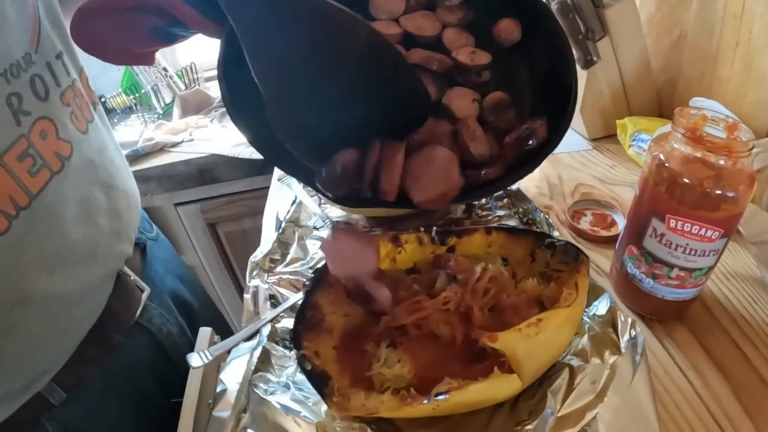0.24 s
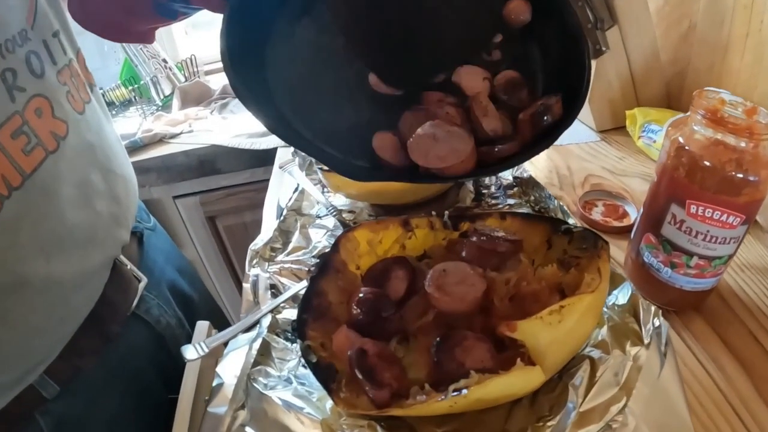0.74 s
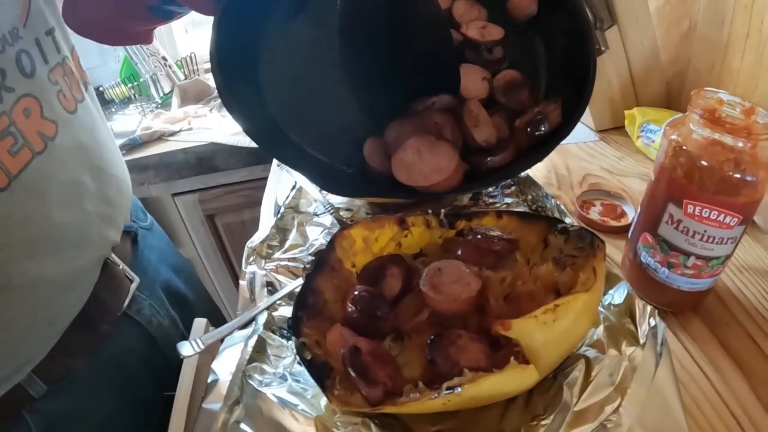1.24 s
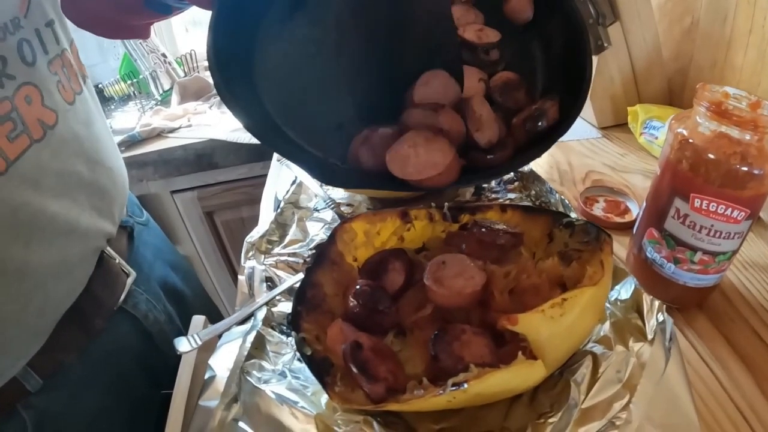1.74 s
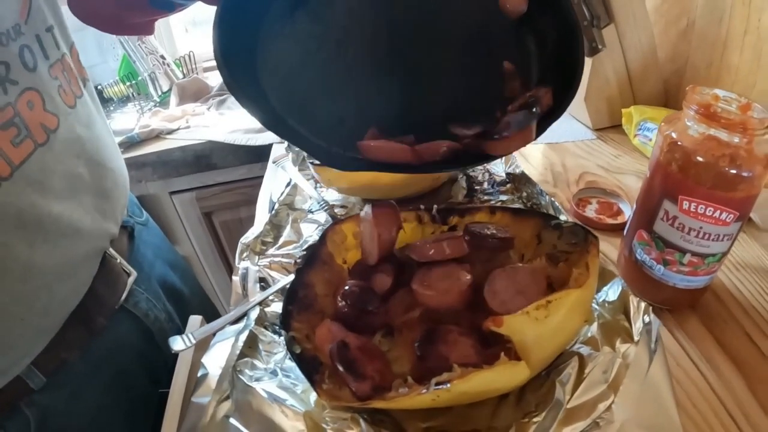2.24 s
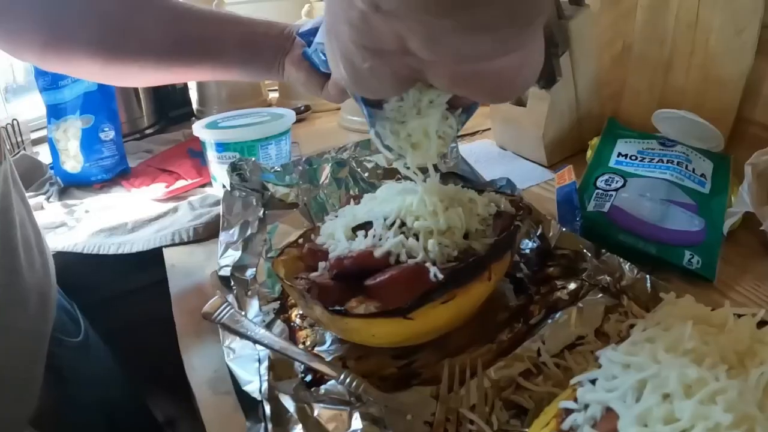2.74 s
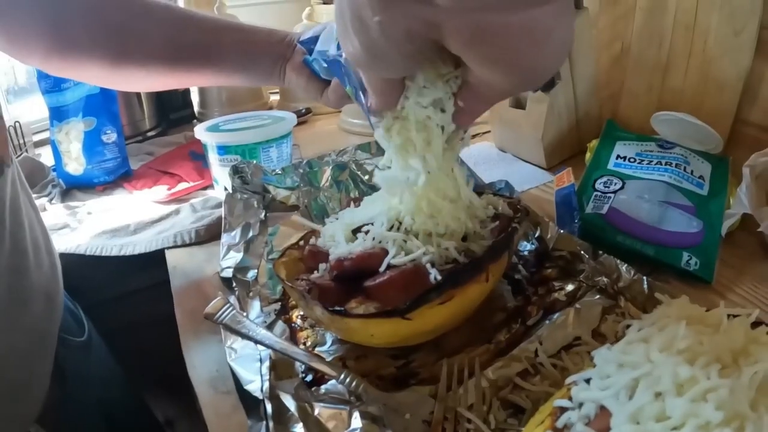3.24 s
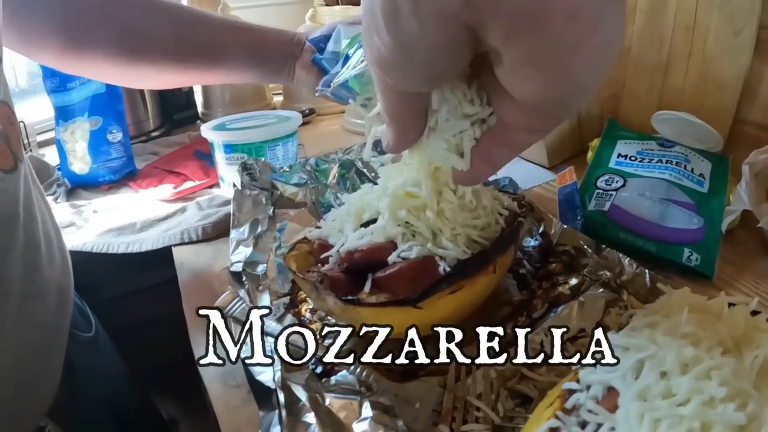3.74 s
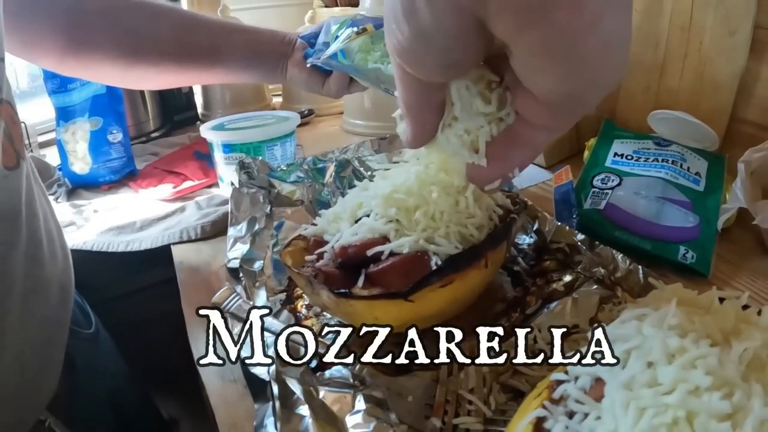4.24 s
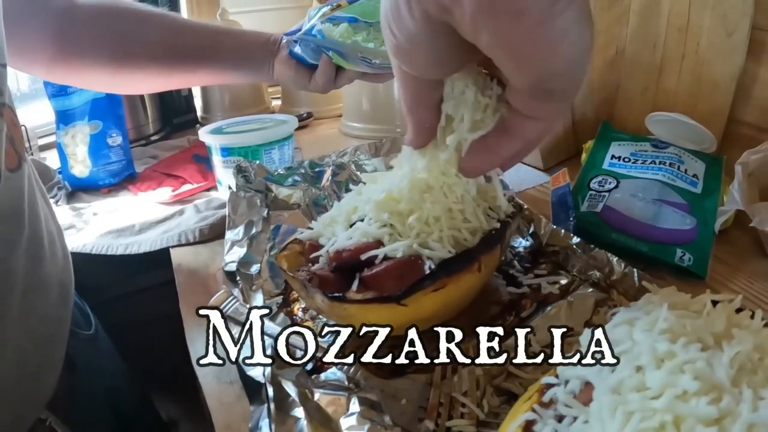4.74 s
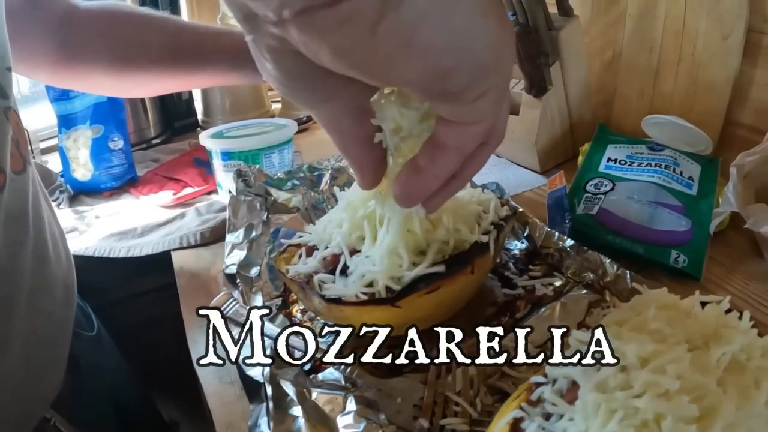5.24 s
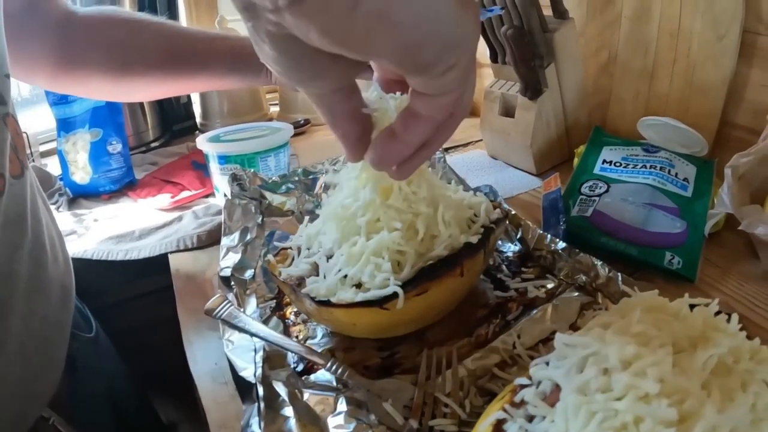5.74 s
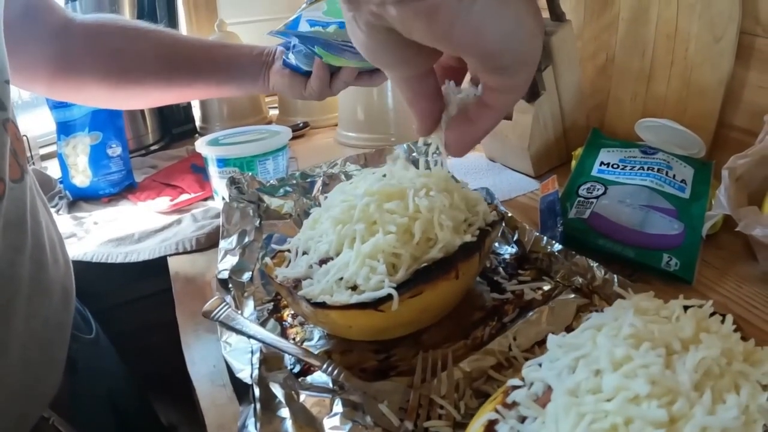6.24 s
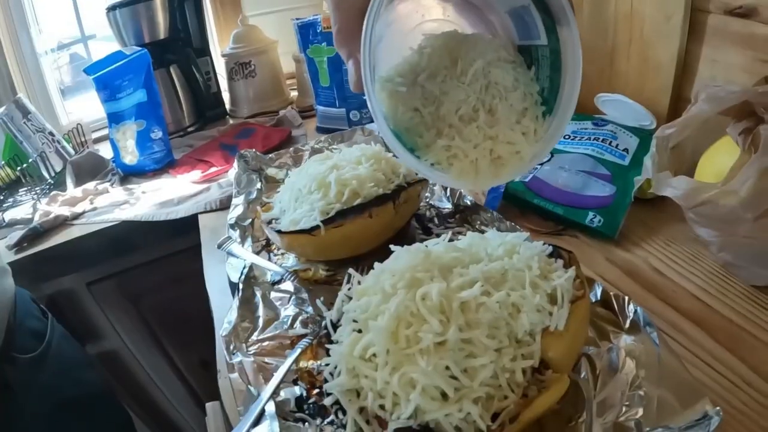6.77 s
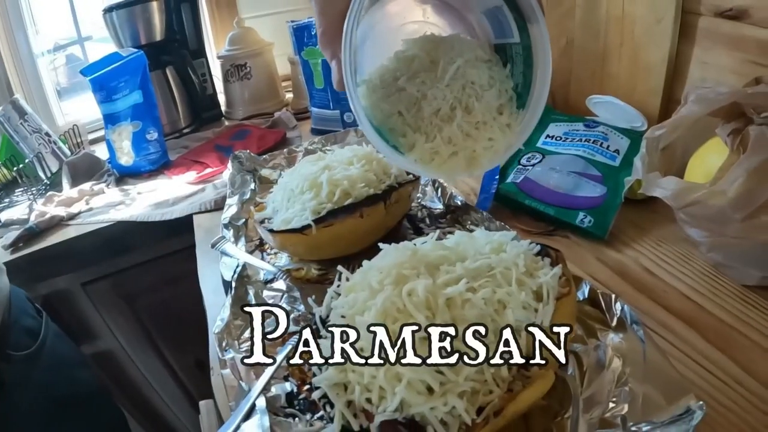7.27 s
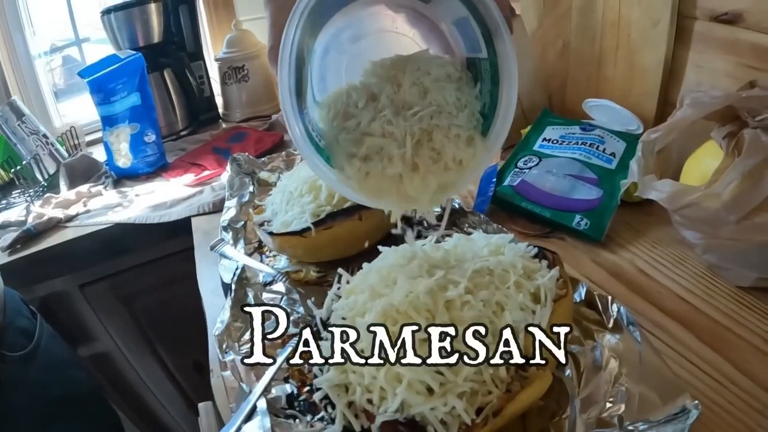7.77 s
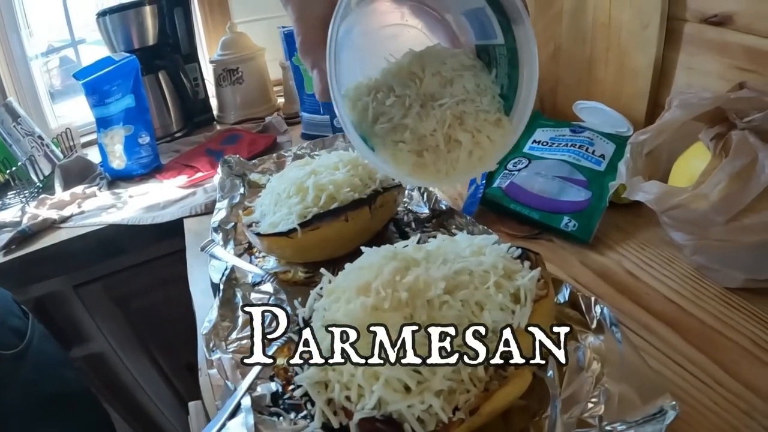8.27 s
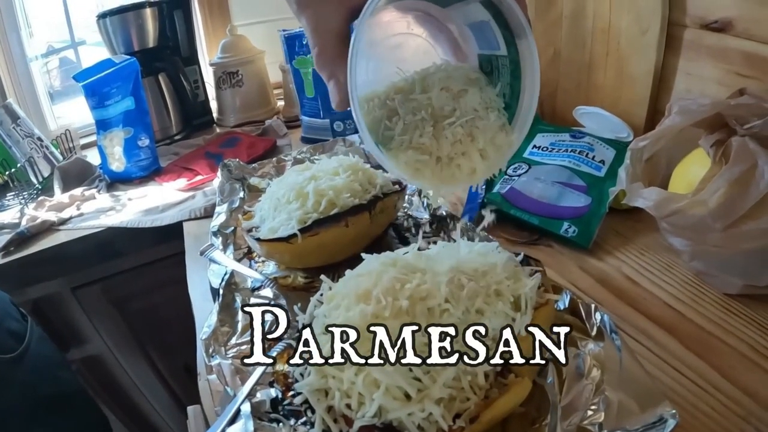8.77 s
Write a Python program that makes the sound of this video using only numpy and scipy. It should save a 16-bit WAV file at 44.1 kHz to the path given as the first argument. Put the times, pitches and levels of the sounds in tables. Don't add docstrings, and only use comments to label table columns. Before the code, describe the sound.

A close kitchen-counter scene over faint steady hum and restless low rumble, with a short room tail. From 0 to 2.7 seconds a spoon scrapes slices from an iron pan: fine gritty rustle, small ticks, a bright tick near 0.65, a damped clunk at 1.36, a sharper knock at 1.5, faint greasy squeaks around 2, and a brief ringing skid at 2.65. At 2.75 it cuts to a plastic bag, with a low nudge, then dense crinkling and snapping, strongest from 3.4 to 5 and again around 6, while shreds patter on foil. From 6.45 things quieten: a tub's contents slide softly, a heavy low thump hits at 7.7 with a smaller thud at 7.9, then a loud crisp tap at 8.35 and lighter taps until about 8.9. The small camera on the counter gives a close, slightly boxy, narrow stereo sound.

```python
import sys
import numpy as np
from scipy import signal
from scipy.fft import rfft, irfft
from scipy.io import wavfile
from scipy.ndimage import uniform_filter1d

SR = 44100
rng = np.random.default_rng(int(sys.argv[2]) if len(sys.argv) > 2 else 0)


def magnitude_from_level(level_db):
    exponent = np.asarray(level_db, float) / 20
    return 10 ** exponent


def put_to_file(sound):
    columns = np.atleast_2d(sound).T
    safe = np.clip(columns, -1, 1)
    whole_steps = np.round(safe * 32767)
    wavfile.write(sys.argv[1], SR, whole_steps.astype(np.int16))


N = 397341


def evened(x):
    return x / np.sqrt(np.mean(x ** 2) + 1e-20)


def smoothed(x, first, second):
    return uniform_filter1d(uniform_filter1d(x, size=first), size=second)


def read(points, hz):
    f, value = np.transpose(points)
    return np.interp(np.log(hz + 1), np.log(f + 1), value)


def add(mix, s, sound):
    part = mix[..., round(s * SR):][..., :sound.shape[-1]]
    part += sound[..., :part.shape[-1]]


def causal(db):
    log = np.log(magnitude_from_level(np.maximum(db, -100)))
    full = np.concatenate([log, log[-2:0:-1]])
    return np.exp(np.conj(signal.hilbert(full)))[:len(db)]


# frequency in Hz, left-right likeness from 0 to 1.
PORT_LIKENESS = [(300, .988), (700, .975), (1400, .93), (2800, .83), (5500, .91), (13000, .72)]


def pair(a, b):
    hz = np.fft.rfftfreq(len(a), 1 / SR)
    same = np.clip(read(PORT_LIKENESS, hz), 0, 1)
    shade = magnitude_from_level(-2.5 * (hz / 13000) ** 2)
    right = shade * (same * rfft(a) + np.sqrt(1 - same ** 2) * rfft(b))
    return np.array([a, irfft(right, len(a))])


def ring(modes, tilt_db, t):
    total = 0
    for hz, db, t60 in modes:
        octaves = np.log2(hz / modes[0][0])
        total = total + magnitude_from_level(db + tilt_db * octaves - 60 * t / t60) * np.sin(2 * np.pi * hz * t)
    return total


# frequency in Hz, level in dB per Hz.
HUM = [(65, -33.5), (110, -8.5), (247, -8), (336, -6.5), (414, -18), (509, -20), (613, -23.5), (739, -30.5),
       (890, -26), (10500, -58.5), (15500, -85)]
# time in seconds, level in dB.
RUMBLE = [(0.0, -43.5), (1.5, -45), (2.46, -48.5), (4.54, -51), (6.5, -52.5), (6.731, -46), (7.501, -50.5),
          (7.68, -42.5), (8.08, -46), (9.01, -47)]


def room():
    hz = np.fft.rfftfreq(N, 1 / SR)
    a, b, c = rfft(rng.standard_normal((3, N)))
    hum = pair(*irfft(np.array([a, b]) * magnitude_from_level(read(HUM, hz)), N))
    hum = hum + 0.38 * np.array([1, -1])[:, None] * np.roll(hum[0], SR)
    lumps = [(4, -3.0), (18, 14.5), (45, 1.5), (62, -7), (90, -19.5), (150, -53.5)]  # Hz, dB
    low = evened(irfft(c * magnitude_from_level(read(lumps, hz)), N))
    s, db = np.transpose(RUMBLE)
    rumble = magnitude_from_level(np.interp(np.arange(N) / SR, s, db)) * np.array([low, low + 0.66 * np.roll(low, SR)])
    return magnitude_from_level(-64.5 + 3.5) * evened(hum) + rumble


def nudge():
    t = np.arange(SR // 5) / SR
    return magnitude_from_level(-26.5) * np.sin(2 * np.pi * 10.6 * t) * np.exp(-t / 0.091)


# frequency in Hz, level in dB, t60 in seconds.
COUNTER = [(42, 6, 0.2), (60, -4, 0.5), (98, -8, 0.33), (136.5, -10, 0.3), (206.7, -3, 0.068)]


def bump(db, tilt_db):
    t = np.arange(SR) / SR
    rocking = magnitude_from_level(3.0 * evened(smoothed(rng.standard_normal(SR), 500, 500)))
    x = -ring(COUNTER, tilt_db, t) * (1 - np.exp(-t / 0.009)) ** 2 * rocking
    late = np.pad(x, (300, 0))[:SR]
    return magnitude_from_level(db) * np.array([x, x + 0.046 * late]) / abs(x).max()


# start in seconds, blow in dB, tilt in dB an octave.
BUMPS = [
    (1.434, -42, 16),
    (3.317, -38, 25),
    (3.465, -32.5, 42),
    (7.482, -37.5, -13),
    (7.712, -9.5, 1.5),
    (7.925, -22.5, 2.5),
    (8.039, -36, -2),
    (8.483, -32, -15),
    (2.808, -36.5, 7.5),
    (3.02, -43.5, 16),
]


def counter_thuds(mix):
    for s, *how in BUMPS:
        add(mix, s, bump(*how))
    add(mix, 2.745, nudge())


def effort(t, moves, rest_db, rest_bright_db):
    swell_db = 20
    s, db, bright_db, rise, fade = np.transpose(moves)[:, :, None]
    away = np.where(t < s, (s - t) / (abs(rise) + 0.0031), (t - s) / (abs(fade) + 0.0019))
    power = magnitude_from_level(db - swell_db * away) ** 2
    rustle = power.sum(0) + magnitude_from_level(rest_db) ** 2
    sizzle = (power * magnitude_from_level(bright_db) ** 2).sum(0) + magnitude_from_level(rest_db + rest_bright_db) ** 2
    return 10 * np.log10(rustle), 10 * np.log10(sizzle)


# frequency in Hz, level in dB, t60 in seconds.
PAN = [(554, 0, 0.23), (993, -7, 0.33), (1460, -3, 0.14), (2260, -23.5, 0.11), (2620, -25, 0.098),
       (2950, -22, 0.1), (3520, -41.5, .08), (3890, -39, 0.075), (5030, -30, 0.07)]


def rubbing(start, end, moves, rest_db, rest_bright_db, tone, body_db, per_s, spread_db, tail_s, smooth,
            patchy_db, iron_db):
    n = round((end - start) * SR) + 512
    clicks = magnitude_from_level(spread_db * np.minimum(rng.exponential(1, n), 3)) * (rng.random(n) < per_s / SR)
    burst = np.sqrt(abs(signal.lfilter([1], [1, -np.exp(-2 / (tail_s * SR))], clicks ** 2)))
    drive = abs(smooth) + burst / np.sqrt(np.mean(burst ** 2))
    x = pair(*(drive * rng.standard_normal((2, n))))
    hz, t, z = signal.stft(x, SR, nperseg=256, noverlap=192)
    z *= magnitude_from_level(read(tone, hz))[:, None]

    now = []
    for lo, hi in [(150, 500), (600, 2200), (3000, 9000)]:
        power = (abs(z[0][(hz > lo) & (hz < hi)]) ** 2).sum(0).mean()
        now.append(10 * np.log10(2 / 1.5 * power))
    rustle, sizzle = effort(t + start, moves, rest_db, rest_bright_db)
    gains = np.array([rustle + body_db, rustle, sizzle]) - np.array(now)[:, None]
    place = np.interp(np.log(hz + 1), np.log([350, 800, 1900, 3800]), [0, 1, 1, 2])
    blend = np.maximum(1 - abs(place[:, None] - np.arange(3)), 0)

    patches = rng.standard_normal(z.shape[1:])
    patches = evened(uniform_filter1d(uniform_filter1d(patches, size=5, axis=0), size=9, axis=1))
    z = z * magnitude_from_level(blend @ gains + patchy_db * patches)
    x = signal.istft(z, SR, nperseg=256, noverlap=192)[1]
    iron = ring(PAN[1:], 3.0, np.arange(SR // 4) / SR)
    iron = iron[None] / np.linalg.norm(iron)
    return x + magnitude_from_level(iron_db) * signal.fftconvolve(x, iron, axes=1)[:, :x.shape[1]]


# frequency in Hz, level in dB per Hz.
BAG_TONE = [(71, -27.5), (120, -10.5), (271, 4.5), (398, -3), (441, -0.5), (704, -11), (1430, -6),
            (4860, -15.5), (7300, -20), (13400, -38), (15500, -43.5)]


def snap(db, centre_hz, treble_db, length):
    t, hz = np.arange(4096) / SR, np.fft.rfftfreq(4096, 1 / SR) + 1
    a, b, panels = rng.standard_normal((3, len(t)))
    rise_s, sharp = 0.002 * min(rng.exponential(), 1), rng.random()
    shape = .2 * np.exp(-t / (0.0014 * length)) + 0.085 * np.exp(-t / (0.0096 * length))
    shape *= 1 - np.exp(-t / rise_s)
    shape *= magnitude_from_level(3.7 * 3.3 * uniform_filter1d(rng.standard_normal(len(t)), size=16))
    a, b = a * shape, b * shape
    a[round(rise_s * SR)] += 1.74 * sharp
    bump_db = 5.5 * np.exp(-(np.log2(hz / centre_hz) / 0.36) ** 2)
    tilt_db = (treble_db + 22.0) * 0.91 * np.clip(np.log2(hz / 1730.0) / 2.73, -.4, 1)
    low_db = 9.7 * np.minimum(np.log2(hz / (0.67 * centre_hz)), 0)
    panels_db = 3.05 * evened(smoothed(panels[:len(hz)], 13, 9))
    colour = causal(read(BAG_TONE, hz) + bump_db + tilt_db + low_db + panels_db)
    x = irfft(rfft(pair(a, b)) * colour, len(t))
    peak = uniform_filter1d(x[0] ** 2, size=88).max() ** .5
    return magnitude_from_level(db - 9.0) * x / peak


def snaps(near, rows, length):
    for s, db, centre_hz, treble_db in rows:
        lasting = length * np.clip(1 - 0.044 * (db + 17), .4, 2.5)
        add(near, s, snap(db, centre_hz, treble_db, lasting))


def knock(modes, db, tilt_db, contact_s, lowest_db):
    t = np.arange(SR // 2) / SR
    ringing = ring(modes[1:], tilt_db, t) * magnitude_from_level(tilt_db * .8) + ring(modes[:1], 0, t) * magnitude_from_level(lowest_db)
    slips = rng.standard_normal(4000) * np.exp(-((t[:4000] - .5 * contact_s) / (0.68 * contact_s)) ** 2)
    if contact_s > .01:
        x = signal.fftconvolve(ringing, slips)
    else:
        x = ringing * (1 - np.exp(-t / (.4 * contact_s))) ** 2
    return magnitude_from_level(db) * x / abs(x).max()


# start in seconds, peak in
# dB, centre in Hz, treble in dB.
CRACKS = [(2.78, -39, 1460, -38), (2.814, -25, 1400, -25), (2.827, -26, 1790, -29), (2.854, -31, 1420, -26),
          (2.943, -32, 1430, -27), (3.035, -26.5, 1400, -34), (3.063, -32.5, 1420, -31),
          (3.147, -36, 1510, -23), (3.39, -46, 1320, -25), (3.613, -31, 1330, -26), (3.644, -26, 1300, -32),
          (3.666, -28, 1320, -25), (3.76, -30, 912, -37), (3.797, -20, 1500, -18), (3.833, -20.5, 956, -22),
          (3.87, -25, 956, -23), (3.893, -29, 2130, -24), (3.98, -28.5, 915, -52), (4.08, -40, 1280, -37),
          (4.121, -42.5, 1450, -30), (4.714, -18.5, 1900, -28), (4.737, -20, 1150, -21),
          (4.79, -21, 1900, -27), (4.996, -24.5, 1270, -27.5), (5.08, -36.5, 1360, -26),
          (5.993, -21, 815, -24), (6.025, -16, 900, -26), (6.142, -32, 501, -42), (6.153, -28, 920, -45),
          (6.179, -37, 1530, -37), (6.258, -34, 1770, -25), (6.294, -41, 800, -37), (6.306, -47, 1410, -40),
          (6.343, -49, 1430, -36), (6.734, -52, 4400, -24), (8.12, -50, 2300, -12),
          (1.526, -29.5, 1450, -40), (1.5, -29, 2300, -22), (2.789, -35, 1700, -12),
          (2.993, -32, 1510, -43), (2.9, -36, 2500, -22), (5.518, -19, 1770, -35), (5.96, -34, 2500, -12),
          (6.209, -19, 1800, -30), (8.197, -47, 6320, -6), (8.207, -46, 11600, 8), (9.4, -36.5, 940, -36),
          (8.681, -35, 980, -40), (8.921, -36, 3280, -11), (4.183, -29.5, 520, -24), (4.2, -35, 4500, -1),
          (1.5, -32, 1900, -26), (6.784, -55, 3500, -18), (8.88, -42, 1900, -33), (2.7, -34, 1200, -21),
          (5.469, -26.5, 1800, -32), (5.481, -27, 1400, -25), (3.704, -29, 1900, -21),
          (.519, -38, 3500, -14), (0.65, -49, 5500, -8), (2.077, -47, 4200, -9), (2.616, -52, 1400, -20),
          (6.745, -59, 4300, -30), (6.757, -55.5, 4600, -30), (6, -49, 1200, -30), (5.665, -54, 4000, 0),
          (2.512, -44, 2500, -30), (2.802, -21, 1900, -16), (6.632, -42, 1000, -30), (6.083, -21, 650, -35),
          (6.051, -22, 800, -28), (6.161, -34, 1200, -30), (5.912, -42, 5500, -2)]


def small_cracks(near):
    snaps(near, CRACKS, 0.48)


CUTS_S = 0, 2.75, 6.45, 9.0
# frequency in Hz, level in dB per Hz.
TUB_TONE = [(150, -26), (250, -27), (330, -12), (635, -29.5), (1310, -19), (1430, -21.5), (6310, -27),
            (12800, -53.5), (15500, -52)]
# top in seconds, effort in dB, brightness in dB, rise in seconds, fade in seconds.
TUB_SHAKES = [(6.621, -54.5, -4, 0.057, 0.067), (6.701, -83, 6.5, 0.069, 0.37), (7.18, -73, 2, 0.15, 0.18),
              (7.299, -65.5, 1, 0.053, 0.072), (7.52, -67, -12, 0.27, 0.16), (7.65, -63, -1, 0.22, 0.1),
              (7.75, -49, -8.5, 0.052, 0.15), (7.84, -64, -0.5, .04, 0.054), (7.94, -60, -0.5, 0.05, 0.18),
              (8.05, -64.5, 0.5, .05, 0.12), (8.2, -66, 4, 0.16, 0.19), (8.36, -55, 1, 0.034, 0.16),
              (8.62, -60, 8.5, 0.044, 0.052), (8.68, -60, -1, 0.18, 0.27), (8.927, -58, 8, 0.011, 0.71)]


def shaken_tub(near):
    add(near, CUTS_S[2], rubbing(
        *CUTS_S[2:], TUB_SHAKES, -86.0, -10, TUB_TONE, body_db=1.0, per_s=69.0, spread_db=-13.0,
        tail_s=0.048, smooth=0.55, patchy_db=2.0, iron_db=-59))


# start in seconds, peak in dB, centre in Hz, treble in dB.
TUB_TAPS = [
    (6.565, -24, 1196, -25.5),
    (7.666, -37.5, 1000, -43),
    (7.738, -34.5, 495, -45),
    (8.346, -17, 2000, -9.5),
    (8.354, -31, 1700, -19),
    (8.397, -22.5, 3600, -18),
    (8.669, -37, 1000, -43),
    (8.935, -30.5, 2080, -16),
]


def tapped_tub(near):
    snaps(near, TUB_TAPS, 1.06)


# top in seconds, effort in dB, brightness in dB, rise in seconds, fade in seconds.
BAG_SQUEEZES = [(2.88, -45.5, -3.5, 0.28, .14), (3.03, -61, -3.5, 0.066, 1),
                (3.33, -54.5, -2.5, 0.083, 0.67), (3.44, -55, -4, 0.093, .05),
                (3.468, -43.5, -10, .02, .09), (3.553, -43, -11, 0.023, 0.053), (3.61, -50, -9, .02, .05),
                (3.644, -38.5, -9, 0.021, 0.04), (3.809, -34, -7.5, 0.07, 0.085),
                (3.941, -41.5, -7, 0.16, 0.11), (4.242, -43.5, -10, 0.054, 0.15),
                (4.52, -51, -6, 0.047, 0.058), (4.679, -44, -7.5, 0.0093, 0.4),
                (4.766, -37.5, -6, 0.073, 0.12), (4.9, -40.5, -6.5, 0.072, 0.18),
                (5.02, -50, -10.5, 0.43, 0.12), (5.169, -62, -19, 0.093, 0.12),
                (5.28, -58, -11, 0.085, 0.086), (5.36, -49.5, -6.5, 0.11, 0.12),
                (5.52, -60, -18, 0.17, 0.14), (5.695, -48.5, -13, 0.015, 0.018),
                (5.78, -60.5, -1, 0.02, 0.12), (5.915, -62, 3, .02, .08), (5.98, -43.5, -3, 0.013, 0.18),
                (6.05, -43.5, -2, 0.072, 0.1), (6.23, -56.5, -4.5, 0.23, 0.13), (6.3, -61, -38, .1, 0.17)]


def squeezed_bag(near):
    add(near, CUTS_S[1], rubbing(
        *CUTS_S[1:3], BAG_SQUEEZES, -91.0, 4.9, BAG_TONE, body_db=-4, per_s=490.0, spread_db=8.5,
        tail_s=0.016, smooth=0.65, patchy_db=4.0, iron_db=-63))


# start in seconds, peak in dB, treble in dB.
CREASES = [(2.879, -20, -25), (3.015, -16.5, -32), (3.461, -17.5, -22), (3.623, -25, -18),
           (3.721, -16, -19), (3.82, -16, -30), (4.026, -24, -37.5), (4.191, -26, -41),
           (4.364, -28.5, -28.5), (4.451, -31, -40), (4.502, -33.5, -29), (4.602, -39, -34),
           (4.669, -17.5, -26), (4.702, -11, -33), (4.752, -17, -23), (4.778, -18, -37), (4.87, -16, -37),
           (4.892, -16, -19), (4.938, -18.5, -34), (5.035, -26.5, -16), (5.185, -35.5, -38),
           (5.255, -30, -22), (4.762, -26, -27), (3.415, -45, -22), (5.558, -30, -26), (5.97, -16, -23),
           (6.019, -16.5, -14), (6.049, -15.5, -52), (6.081, -17, -31)]
# start in seconds, peak in dB, centre in Hz, treble in dB.
FOLDS = [(2.803, -20, 1950, -22), (3.257, -35.5, 850, -28.5), (3.32, -19, 2180, -15.5),
         (3.519, -14.5, 1970, -23), (3.547, -20, 2950, -35), (3.78, -20.5, 890, -26),
         (3.844, -18, 925, -33), (3.91, -22.5, 501, -28), (3.933, -20, 910, -21.5), (4.229, -21, 850, -33),
         (4.284, -20, 2800, -18.5), (4.856, -26.5, 500, -27), (4.971, -21, 960, -35),
         (5.282, -24.5, 490, -43), (5.315, -26.5, 3620, -3.5), (5.359, -22.5, 1000, -33),
         (5.406, -35.5, 3320, -14), (5.509, -19, 2910, -35), (5.516, -20.5, 1900, -29.5),
         (5.684, -24, 4280, 1), (5.714, -34.5, 6170, 34), (5.764, -26, 3800, -18), (5.901, -39, 930, -17),
         (6.212, -20, 1000, -36.5), (6.228, -22, 1760, -31)]


def snapping_bag(near):
    face_hz = 1490
    snaps(near, [(s, db, face_hz, treble_db) for s, db, treble_db in CREASES], 1.16)
    snaps(near, FOLDS, 0.82)


# start in seconds, blow in dB, tilt in dB an octave, contact in seconds, lowest mode in dB.
KNOCKS = [
    (1.525, -35, -3, .002, 9),
    (2.075, -53, 7, .05, -20),
]
# frequency in Hz, level in dB, t60 in seconds.
SQUEAL = [(976, -9.5, 0.44), (2121, -16, .15), (1460, -0.5, 0.27), (3560, -14, 0.12), (1720, -13, 0.14),
          (2480, -7, 0.13), (2950, -3.5, .13), (3900, -9, 0.15), (4550, -13, .09), (5090, -2, 0.075),
          (5580, -3, .06), (6620, -14, .06), (3230, -15, .15), (6261, -13, .1)]
# frequency in Hz, level in dB, t60 in seconds.
PRESSED_PAN = [(255, -3, 0.025), (519, -13, 0.02), (568, 1, 0.047), (611, -4, 0.047), (960, -11, 0.09),
               (1030, 6.5, 0.031), (1150, -8, 0.051), (1480, -10.5, 0.028), (2170, -12, 0.04),
               (2490, -14, .05), (1840, -18, .04)]


def ringing_pan(near):
    for s, *how in KNOCKS:
        add(near, s, knock(PAN, *how))
    add(near, 2.655, knock(SQUEAL, -32, 0, 0.0074, 0))
    clunk = knock(PRESSED_PAN, -14, 0, 0.0055, -6)
    add(near, 1.3605, np.array([clunk, np.roll(clunk, shift=3)]))
    add(near, 1.3605, snap(-29, 6040, -13, 1.0))


# frequency in Hz, level in dB, t60 in seconds.
WHISTLE = [(4690, 0, 0.1)]
WHISTLES_S = 1.975, 2.015, 2.075


def slipping_spoon(near):
    for s in WHISTLES_S:
        add(near, s, knock(WHISTLE, -59, 0, 0.028, 0))
    add(near, 1.397, knock(PRESSED_PAN, -36, -5, .004, 0))


# start in seconds, peak in dB, centre in Hz, treble in dB.
PAN_TICKS = [(0.087, -36, 2600, -12), (0.159, -34, 3050, -21), (0.595, -33, 1560, -18),
             (0.652, -15, 5800, -6), (0.78, -35.5, 4670, 1), (1.157, -29.5, 2920, -7),
             (1.208, -34.5, 3200, -10), (1.436, -35.5, 1100, -18), (1.468, -31, 1040, -12),
             (1.563, -26, 554, -11), (1.729, -40.5, 2570, -20), (2.192, -34.5, 3080, -20),
             (2.211, -38, 2900, -2), (2.246, -38.5, 2900, -13), (2.281, -39.5, 2290, -19),
             (2.33, -26, 3800, -10), (2.485, -42, 6500, -10), (2.734, -33.5, 3000, -30)]


def ticking_pan(near):
    snaps(near, PAN_TICKS, 0.95)


# frequency in Hz, level in dB per Hz.
SCRAPE_TONE = [(71, -38.5), (120, 2.5), (188, -24), (319, -1), (810, -31.5), (980, -17), (5380, -10),
               (11400, -26), (15500, -40)]
# top in seconds, effort in dB, brightness in dB, rise in seconds, fade in seconds.
SPOON_STROKES = [(0.0, -56, 5.5, .05, 0.096), (0.201, -67, 12.5, 0.25, 0.072),
                 (.38, -60.5, 0, 0.024, 0.054), (.437, -58, 4, 0.095, 0.068),
                 (0.508, -52.5, 0.5, 0.046, 0.078), (.66, -68.5, 9.5, 0.12, 0.15),
                 (1.159, -57.5, 1, 0.045, 0.32), (1.369, -53, -11, 0.08, 0.059),
                 (1.483, -45.5, 2, 0.011, 0.18), (1.74, -57.5, -4, 0.054, 0.092),
                 (1.93, -74, 18, 0.11, 0.16), (2.09, -62.5, 9.5, 0.087, 0.16), (2.25, -65, -17, 0.35, 0.35),
                 (2.49, -69, 8, 0.03, .1), (2.575, -65.5, 4.5, .02, 0.075),
                 (2.665, -54.5, 4.5, 0.05, 0.092), (2.737, -57, 4, .02, .03)]


def scraping_spoon(near):
    add(near, CUTS_S[0], rubbing(
        *CUTS_S[:2], SPOON_STROKES, -80.0, -8.0, SCRAPE_TONE, body_db=-5.0, per_s=260, spread_db=4.5,
        tail_s=.006, smooth=0.57, patchy_db=2.0, iron_db=-17.0))


def walls(x):
    t = np.arange(SR // 3) / SR
    taps = rng.choice([-1., 1.], (2, len(t))) * (rng.random((2, len(t))) < .045)
    taps = taps * magnitude_from_level(-60 * t / 0.18) * (t > .004)
    return signal.fftconvolve(x, pair(*taps) / np.linalg.norm(taps[0]), axes=1)[:, :N]


# time in seconds, left minus right in dB.
HANDS = [(0.0, -1), (3.86, 0.0), (4.141, -1.0), (5.44, -1), (5.52, -3.5), (5.61, -0.5), (7.09, -0.5),
         (7.14, 2.5), (8.37, 0.5), (8.42, -5), (8.45, 0.5), (9.0, -0.5)]


def placed(near):
    left_db = .5 * np.interp(np.arange(N) / SR, *np.transpose(HANDS))
    return near * magnitude_from_level([left_db, -left_db])


def scene():
    near, mix = np.zeros((2, N)), room()
    scraping_spoon(near)
    squeezed_bag(near)
    shaken_tub(near)
    ticking_pan(near)
    snapping_bag(near)
    tapped_tub(near)
    ringing_pan(near)
    counter_thuds(mix)
    small_cracks(near)
    slipping_spoon(near)
    return mix + placed(near + magnitude_from_level(-15.5) * walls(near))


# frequency in Hz, width in Hz, level in dB.
HOUSING = [(758, 2000, -0.5), (1000, 152, 3.5), (1390, 37, 1), (14360, 500, 2.5)]


def camera_body(x):
    hz = np.fft.rfftfreq(2048, 1 / SR)
    colour_db = sum(db / (1 + (2 * (hz - f) / width) ** 2) for f, width, db in HOUSING)
    colour_db = colour_db - 40 * np.clip((hz - 14700) / 1300.0, 0, 1)
    return signal.oaconvolve(x, irfft(causal(colour_db))[None], axes=1)[:, :N]


# frequency in Hz, ease in dB.
KEPT = [(300, 0), (1500, 2), (2800, -1), (4400, -4), (5200, 2), (7500, 0), (8800, -5), (11500, -1),
        (14000, -3)]


def narrowed(x, under_db, top_db, waver_db, keep_db, busy_db, busy_share, sudden):
    def total_db(power):
        return 10 * np.log10(power.sum(0) + 1e-20)

    hz, t, (mid, side) = signal.stft([x[0] + x[1], x[0] - x[1]], SR, nperseg=2048)
    band = np.round(8 * np.log2(hz / 400 + 1)).astype(int)
    member = band == np.arange(band.max() + 1)[:, None]
    ratio_db = 10 * np.log10((member @ abs(side) ** 2 + 1e-20) / (member @ abs(mid) ** 2 + 1e-20))
    waver = evened(uniform_filter1d(rng.standard_normal(ratio_db.shape), size=3, axis=1))
    busy = np.maximum(total_db(abs(mid[hz > 60]) ** 2) - busy_db, 0)
    ratio_db = ratio_db - busy_share * busy * np.linspace(1, -.5, len(member))[:, None]
    jump = np.maximum(np.diff(total_db(abs(mid[hz > 500]) ** 2), prepend=0), 0)
    ratio_db = ratio_db + sudden * jump + read(KEPT, member @ hz / member.sum(1))[:, None]
    keep = 1 / (1 + np.exp(np.clip(under_db - ratio_db - waver_db * waver, -30, 30)))

    top = hz > 13500
    faint_db = top_db - total_db(abs(mid[top]) ** 2)
    opened = 1 - top[:, None] / (1 + np.exp(np.clip(-faint_db, -30, 30)))
    kept_side = side * magnitude_from_level(keep_db) * keep[band] ** 2
    mid, side = signal.istft(opened * [mid, kept_side], SR, nperseg=2048)[1][:, :N]
    return (mid + np.array([side, -side])) / 2


def low_pass(x):
    return signal.sosfilt(signal.butter(12, 15830, fs=SR, output="sos"), x)


def record(dry):
    mix = narrowed(camera_body(dry), under_db=-11.5, top_db=-88.5, waver_db=5.5, keep_db=2.0,
                   busy_db=-39.5, busy_share=0.82, sudden=.9)
    return low_pass(mix)


dry = scene()
out = record(dry)
put_to_file(out)
```